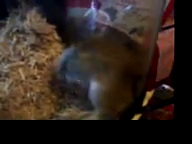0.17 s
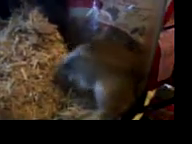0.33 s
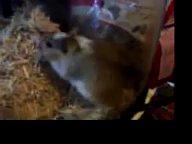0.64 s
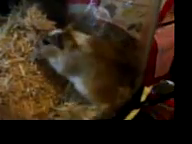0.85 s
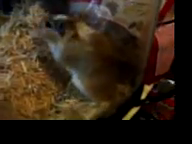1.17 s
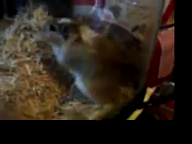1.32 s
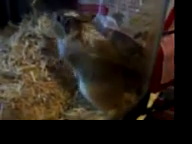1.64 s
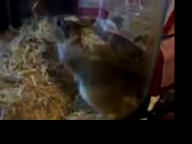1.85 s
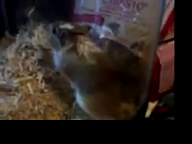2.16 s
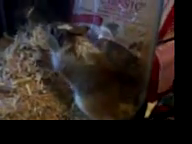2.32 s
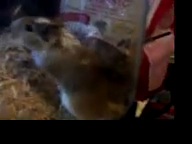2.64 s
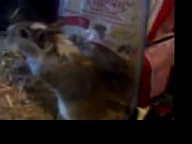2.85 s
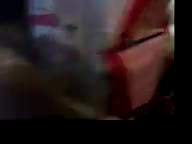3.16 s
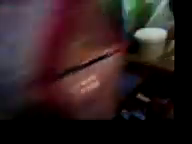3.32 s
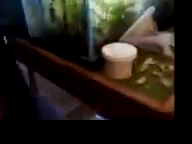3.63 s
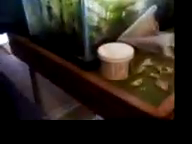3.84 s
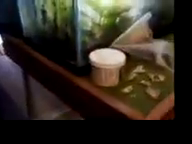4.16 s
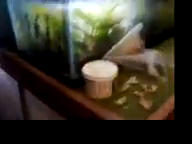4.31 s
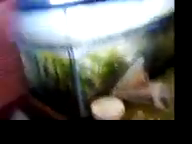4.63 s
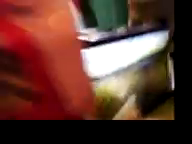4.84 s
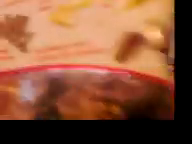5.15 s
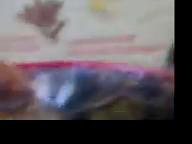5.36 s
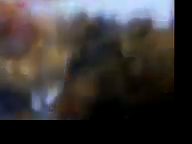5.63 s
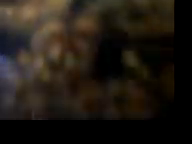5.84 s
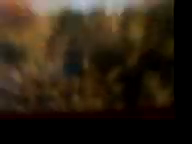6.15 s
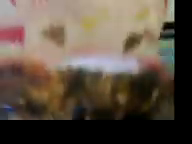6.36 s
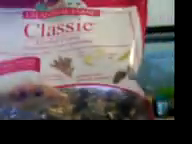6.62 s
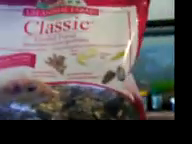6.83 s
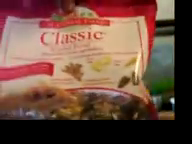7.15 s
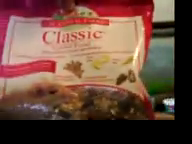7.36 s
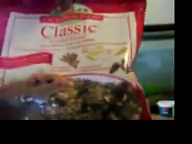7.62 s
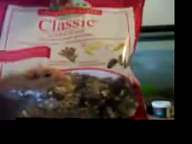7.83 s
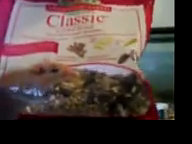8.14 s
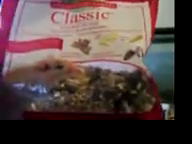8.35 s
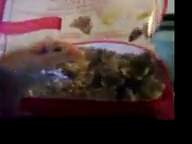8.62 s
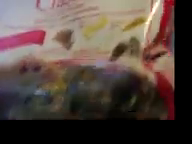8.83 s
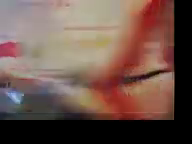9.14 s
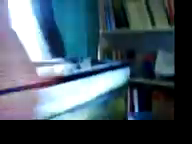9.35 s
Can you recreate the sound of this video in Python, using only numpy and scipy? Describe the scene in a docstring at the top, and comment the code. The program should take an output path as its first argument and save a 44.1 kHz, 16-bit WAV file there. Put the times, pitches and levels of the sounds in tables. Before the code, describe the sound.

A cheap, narrow-band microphone in a quiet room carries low hiss, faint hum, regular fast ticks and occasional tiny electrical pips. A sharp knock comes early, then little until a small clear tink near 2.7 seconds. Fingers then rap and scrape the plastic shell, crowding into a loud, clipping clatter around four seconds. Afterwards only scattered soft knocks, rubs and dull bumps remain, with another double click late on.

```python
"""A small camera is carried from a gerbil's tank to a bag of feed in a quiet room.
From 0 s: shaped-noise hiss, mains hum, a regular tick train, faint pips; skin slides on the shell (one resonance).
From 0.4 s: fingers scrape (stick-slip into resonances) and knock (decaying modes) its plastic shell.
At 0.42 s and 2.66 s small hard things tink (clean modes); from 2.87 s dull low bumps join, knocks crowding near 4 s.
The narrow-band microphone path overloads on the hardest knocks."""
import sys
import numpy as np
from scipy import signal
from scipy.fft import rfft, irfft
from scipy.io import wavfile
from scipy.ndimage import uniform_filter1d

SR = 44100
rng = np.random.default_rng(int(sys.argv[2]) if len(sys.argv) > 2 else 0)


def master_out(mix):
    """Clip the mix to full scale and print it as 16-bit PCM to the path in sys.argv[1]."""
    frames = np.transpose(np.atleast_2d(mix))
    ceiling = np.clip(frames, -1, 1)
    pcm = np.round(ceiling * 32767).astype(np.int16)
    wavfile.write(sys.argv[1], SR, pcm)


N = 418068
TIME_S = np.arange(N) / SR
MIC_EDGE_HZ, OUTPUT_EDGE_HZ = 4020, 16000


def amp(db):
    """Decibels to gain."""
    return 10 ** (np.asarray(db) / 20)


def unit(x):
    """Scales to rms 1."""
    return x / np.sqrt(np.mean(x ** 2) + 1e-20)


def read(points, hz):
    """Interpolates a spectrum table on a log-frequency axis."""
    point_hz, value = np.transpose(points)
    return np.interp(np.log(hz + 1), np.log(point_hz), value)


def add(mix, start_s, sound):
    """Mixes a sound in at start_s."""
    part = mix[max(round(start_s * SR), 0):][:len(sound)]
    part += sound[:len(part)]


def low_pass(x, hz, size):
    """Steep linear-phase low-pass, delay removed."""
    return signal.oaconvolve(x, signal.firwin(size, hz, window=("kaiser", 8), fs=SR), "same")


def resonate(x, hz, width_hz):
    """Two-stage resonance following hz: shift down to 0 Hz, smooth, shift back."""
    turn = np.exp(2j * np.pi * np.cumsum(hz * np.ones(len(x))) / SR)
    r = np.exp(-np.pi * width_hz / SR)
    smoothed = signal.lfilter([(1 - r) ** 2], [1, -2 * r, r * r], x / turn + 1e-18)
    return 2 * (turn * smoothed).real


def ring(modes, hz, t60_s, scatter, rise_s):
    """Decaying modes, peak 1; scatter detunes each blow's modes, rise_s is the contact time."""
    t = np.arange(SR // 4) / SR
    shifts = 1 + scatter * rng.standard_normal(len(modes))
    wave = np.zeros(len(t))
    for (factor, db, life), shift in zip(modes, shifts):
        decay = np.exp(-np.log(1000) * t / (t60_s * life))
        wave += amp(db) * decay * np.sin(2 * np.pi * hz * factor * shift * t)
    wave = wave * (1 - np.exp(-(t / rise_s) ** 2))
    return wave / abs(wave).max()


def stroke(t, length_s, attack_s, release_db_per_s):
    """Finger-stroke envelope: linear attack, hold until length_s, exponential release."""
    return np.minimum(t / attack_s, 1) * amp(-np.cumsum(release_db_per_s * (t > length_s)) / SR)


# hiss spectrum shape: frequency_hz, relative_level_db
HISS_SHAPE = [(15, -4), (30, -1), (80, -7.5), (150, -1.5), (300, -5.5), (600, -5.5), (1000, -11),
              (2000, -12.5), (3500, -16), (4400, -21)]
# mains hum partials: frequency_hz, rms_db
HUM_PARTIALS = [(59.6, -61), (119.3, -59.5), (179, -58.5), (238.6, -62.5), (299, -63)]
# electrical pips: centre_s
PIP_TIMES = [.061, .849, 1.176, 1.823, 3.523, 4.628, 4.813, 5.209, 6.84, 6.993, 7.816, 8.096, 8.716]
HISS_RMS_DB, PIP_RMS_DB = -47, -47  # hiss: below MIC_EDGE_HZ; pip: before its fades
TICK_FIRST_S, TICK_EVERY_S, TICK_MEAN_DB, TICK_SPREAD_DB = .0069, .05244, -19, 1.8
# low swing after every tick, level relative to the tick
SWING_DB, SWING_HZ, SWING_T60_S = -28, 118, 0.019 * 0.93


def electronics(pip_hz=1445, pip_s=0.032, pip_waver=0.044):
    """Shaped noise, steady sines, short wavering pips and a regular impulse train with low swings."""
    hiss = irfft(rfft(rng.standard_normal(N)) * amp(read(HISS_SHAPE, np.fft.rfftfreq(N, 1 / SR))), N)
    out = amp(HISS_RMS_DB) * hiss / np.std(low_pass(hiss, MIC_EDGE_HZ, size=255))
    for hz, db in HUM_PARTIALS:
        out += amp(db) * np.sqrt(2) * np.sin(2 * np.pi * (hz * TIME_S + rng.random()))
    t = np.arange(0, pip_s, 1 / SR)
    fades = signal.windows.tukey(len(t), .2)
    for centre_s in PIP_TIMES:
        waver = pip_waver * unit(uniform_filter1d(rng.standard_normal(len(t)), size=120))
        # phase skips part of a cycle midway
        skip_cycles = rng.uniform(.3, .6) * (t > rng.uniform(.3, .7) * pip_s)
        cycles = np.cumsum(pip_hz * (1 + waver)) / SR + skip_cycles
        pip = np.sqrt(2) * np.sin(2 * np.pi * cycles) * fades
        add(out, centre_s - pip_s / 2, amp(PIP_RMS_DB) * pip)
    tick_s = np.arange(TICK_FIRST_S, TIME_S[-1], TICK_EVERY_S)
    train = np.zeros(N)
    train[(tick_s * SR).astype(int)] = amp(TICK_MEAN_DB + TICK_SPREAD_DB * rng.standard_normal(len(tick_s)))
    swing = amp(SWING_DB) * ring([(1, 0, 1)], SWING_HZ, SWING_T60_S, scatter=0, rise_s=0.00074)
    return out - train + signal.oaconvolve(train, swing)[:N]


# main shell resonance as the grip tightens and loosens: time_s, resonance_hz
GRIP_PITCH = [(.1, 530), (.41, 765), (.55, 520), (2.75, 784), (3.2, 762), (3.8, 479), (4.15, 480),
              (4.29, 680), (4.33, 697), (4.42, 543), (5.2, 586), (9.4, 558)]


def grip_hz(t):
    """Main shell resonance at time t: a tighter grip raises it."""
    return np.interp(t, *np.transpose(GRIP_PITCH))


def slips(size, per_s, spread_db, smooth):
    """Stick-slip friction: tiny clicks of uneven size over a smooth rub."""
    clicks = (rng.random(size) < per_s / SR) * rng.choice([-1, 1], size)
    clicks = clicks * amp(spread_db * np.minimum(rng.exponential(1, size), 3))
    return unit(unit(clicks) + smooth * rng.standard_normal(size))


# skin sliding on the shell: start_s, length_s, level_db
SKIN_SLIDES = [(0, 0.069, -48), (0.474, .2, -48), (3.175, .25, -47), (4.45, .3, -44.5),
               (5.075, 0.055, -40.5), (5.25, 0.34, -54), (6.25, 0.086, -49), (6.857, 0.21, -45),
               (8.782, 0.27, -44), (9.095, 0.46, -49)]
SLIDE_ATTACK_S, SLIDE_RELEASE_DB_PER_S = 0.031, 108.5


def slide(width_hz=260):
    """Soft skin friction excites only the main shell resonance."""
    rub = resonate(slips(N, per_s=700, spread_db=-1.0, smooth=0.62), grip_hz(TIME_S), width_hz)
    pressure, t = np.zeros(N), np.arange(SR) / SR
    for start_s, length_s, db in SKIN_SLIDES:
        add(pressure, start_s, amp(db) * stroke(t, length_s, SLIDE_ATTACK_S, SLIDE_RELEASE_DB_PER_S))
    return unit(rub) * pressure


LOOSE_HZ, TIGHT_HZ = 579, 790


def by_grip(t, loose, tight):
    """Blends two values by grip tightness at time t, read from the shell resonance."""
    return np.interp(grip_hz(t), [LOOSE_HZ, TIGHT_HZ], [loose, tight])


# fingers scraping: start_s, length_s, body_db, grit_db
FINGER_SCRAPES = [(.399, .015, -24, -30.5), (2.757, 0.077, -33, -37), (2.882, 0.046, -43, -41),
                  (3.135, 0.035, -37, -37.5), (3.764, .085, -33, -41), (3.865, 0.048, -22.5, -43),
                  (3.909, 0.064, -17, -25), (4.027, 0.058, -32.5, -32.5), (4.088, 0.049, -18.5, -26.5),
                  (4.252, 0.023, -27.5, -32), (4.278, 0.064, -16, -25.5), (4.359, 0.046, -24.5, -33.5),
                  (4.46, 0.046, -40, -42), (8.426, .022, -39, -35)]
# low shell resonances: grip_pitch_factor, width_hz, relative_level_db
BODY_RESONANCES = [(.62, 170.5, -3.5), (1.0, 206, 5.5), (1.28, 219, 2.5)]
# upper shell resonances: centre_hz (before wander), width_hz, relative_level_db
GRIT_RESONANCES = [(1338, 550, -22.5), (1675, 550, 9), (2297, 790, 5.5), (3420, 2400, -9)]
SCRAPE_ATTACK_S = 0.0034
# a tight grip stops a scrape sooner
RELEASE_LOOSE_DB_PER_S, RELEASE_TIGHT_DB_PER_S = 178.5, 901.5


def scrapes(wander=0.11):
    """Stick-slip drives low body resonances and gritty upper ones that wander as the contact moves."""
    out, t = np.zeros(N), np.arange(SR // 2) / SR
    for start_s, length_s, body_db, grit_db in FINGER_SCRAPES:
        drive = slips(len(t), per_s=600, spread_db=3.5, smooth=0.75)
        grip = grip_hz(start_s + t)
        contact = np.exp(wander * unit(uniform_filter1d(rng.standard_normal(len(t)), size=1200)))
        body = unit(sum(amp(db) * resonate(drive, grip * factor, width_hz)
                        for factor, width_hz, db in BODY_RESONANCES))
        grit = unit(sum(amp(db) * resonate(drive, hz * contact, width_hz)
                        for hz, width_hz, db in GRIT_RESONANCES))
        release = by_grip(start_s + t, RELEASE_LOOSE_DB_PER_S, RELEASE_TIGHT_DB_PER_S)
        envelope = stroke(t, length_s, SCRAPE_ATTACK_S, release)
        add(out, start_s, (amp(body_db) * body + amp(grit_db) * grit) * envelope)
    return out


# after-ring colour: frequency_hz, level_db
AFTER_COLOUR = [(60, -36.5), (250, -4.5), (550, -6), (1100, 2), (2200, -4), (4000, 3.5)]
# after-ring decay: frequency_hz, t60_s
AFTER_DECAY = [(150, 0.6), (550, 0.34), (1200, 0.12), (3000, 0.12)]


def after_ring():
    """Diffuse tail of the shell's many weak modes: noise decaying at its own rate in each band."""
    hz, t, bands = signal.stft(rng.standard_normal(SR // 3), SR, nperseg=256)
    decay = np.exp(-np.log(1000) * t / read(AFTER_DECAY, hz)[:, None])
    tail = signal.istft(bands * decay, SR, nperseg=256)[1]
    tail = np.pad(tail / np.linalg.norm(tail), 256)
    colour = amp(read(AFTER_COLOUR, np.fft.rfftfreq(len(tail), 1 / SR)))
    return irfft(rfft(tail) * colour)[256:]


# finger knocks on the shell: start_s, thud_db, snap_db, thud_pitch_hz, snap_pitch_hz
FINGER_KNOCKS = [(0.4222, -16.5, -1, 670, 2453), (0.4294, -16.5, -7.5, 866, 2030),
                 (2.729, -22.5, -29.5, 860, 2190), (2.809, -16.5, -33, 840, 2200),
                 (2.872, 8.5, -1, 724, 2200), (2.8775, -3, -4.5, 809, 1930),
                 (2.974, -24.5, -22.5, 920, 2390), (3.008, -22, -21.5, 614, 1860),
                 (3.0159, -16.5, -18.5, 724, 2300), (3.075, -23, -25.5, 824, 2380),
                 (3.1648, -18, -9, 933, 1670), (3.175, -22, -20, 830, 2120), (3.4287, -11.5, -8, 703, 1883),
                 (3.768, -25.5, -25, 503, 2265), (3.867, -7, -13, 463, 1730), (3.9195, -.5, 1.5, 530, 1950),
                 (3.9335, -5.5, -8.5, 536, 2055), (3.945, -7, -16, 500, 1865),
                 (3.9635, -8.5, -6, 495, 1770), (3.9794, 1.5, -3, 486, 2356),
                 (4.0848, 1.5, -1.5, 556, 2200), (4.131, -7.5, -11, 474, 2015), (4.257, -8, -11, 616, 1910),
                 (4.279, -3.5, -2.5, 718, 1910), (4.285, 1, -6.5, 698, 2220), (4.297, -1.5, -16, 727, 2390),
                 (4.314, -7.5, -25, 670, 1650), (4.3505, -6, -5.5, 606, 1720),
                 (4.3823, -6.5, -18.5, 613, 1880), (4.457, -25, -14, 625, 1910),
                 (4.4807, -12.5, -21.5, 512, 2300), (4.91, -27.5, -31.5, 487, 2280),
                 (4.9485, -23, -25.5, 603, 1560), (5.0917, -11, -11.5, 500, 1720),
                 (5.252, -17, -36, 617, 1800), (5.9271, -18.5, -24.5, 636, 1432),
                 (5.9873, -21.5, -30.5, 488, 1790), (6.249, -12, -31, 430, 1340),
                 (6.5405, -29.5, -27.5, 735, 1970), (6.8622, -15, -22.5, 501, 1880),
                 (8.3494, -16.5, -11.5, 563, 2010), (8.4275, -37, -11, 612, 2910),
                 (8.4297, -18.5, -10.5, 603, 1970), (8.722, -29, -41, 474, 1586),
                 (9.0498, -24.5, -26, 518, 1840), (9.43, -21.5, -34.5, 488, 1660)]
# low shell modes: pitch_factor, relative_level_db, t60_factor
THUD_SHELL_MODES = [(.55, -8.5, 0.93), (.8, -3.5, 1.25), (1.03, 3, 0.91), (1.25, -8.5, 1.23)]
# high shell modes: pitch_factor, relative_level_db, t60_factor
SNAP_SHELL_MODES = [(.76, -1, 1), (1.0, 6, 0.56), (1.27, -2, 0.57), (1.65, -14, 0.41)]
# base t60 in thud cycles at equal snap and thud; shorter as the snap stands further over the thud
RING_CYCLES, SHORTEN_OCTAVES_PER_DB = 14.04, .02
CLICK_OVER_SNAP_DB = 2.5
TOUCH_LEAD_S, TOUCH_DB = 0.0096, -26  # light touch before landing, relative to the blow
AFTER_LOOSE_DB, AFTER_TIGHT_DB = -10, -25.5  # a tight grip damps the after-ring


def knocks():
    """Light touch, then contact click, brief snap and low thud of the shell modes, faint after-ring."""
    out = np.zeros(N)
    for start_s, thud_db, snap_db, thud_hz, snap_hz in FINGER_KNOCKS:
        t60_s = RING_CYCLES / thud_hz / 2 ** (SHORTEN_OCTAVES_PER_DB * (snap_db - thud_db))
        blow = amp(thud_db) * ring(THUD_SHELL_MODES, thud_hz, t60_s, scatter=0.041, rise_s=0.0019)
        blow += amp(snap_db) * ring(SNAP_SHELL_MODES, snap_hz, t60_s, scatter=.04, rise_s=.00025)
        blow[0] += amp(snap_db + CLICK_OVER_SNAP_DB)
        add(out, start_s - TOUCH_LEAD_S, amp(TOUCH_DB) * blow)
        add(out, start_s, blow)
        after_gain = amp(by_grip(start_s, AFTER_LOOSE_DB, AFTER_TIGHT_DB))
        add(out, start_s, after_gain * signal.oaconvolve(blow, after_ring()))
    return out


# touches on small hard things: start_s, peak_db, pitch_factor
HARD_TOUCHES = [(0.424, -34, 1.19), (2.6644, -25.5, 1.004)]
# their modes: base_hz, relative_level_db, base_t60_s
HARD_MODES = [(1560, -9.5, 0.42), (2017, 0, 0.15), (2446, -17, 0.2)]


def tink():
    """Each touch rings a few clean modes of a small hard thing."""
    out = np.zeros(N)
    for start_s, db, pitch_factor in HARD_TOUCHES:
        # t60_s here scales the table's base_t60_s
        add(out, start_s, amp(db) * ring(HARD_MODES, pitch_factor, t60_s=0.92, scatter=0, rise_s=0.00032))
    return out


# dull bumps of the whole camera: start_s, peak_db, base_hz, base_t60_s
CAMERA_BUMPS = [(2.871, -12.5, 75, 0.022), (4.12, -20, 274, .12), (5.094, -26.5, 196, 0.068),
                (5.258, -31, 112, 0.14), (5.354, -29, 250, 0.018), (5.357, -34, 98, 0.1),
                (6.2489, -22, 241, 0.042), (6.8626, -17.5, 273, 0.057)]


def bumps():
    """A push rocks the whole camera in one low, quickly dying swing."""
    out = np.zeros(N)
    for start_s, db, hz, t60_s in CAMERA_BUMPS:
        add(out, start_s, amp(db) * ring([(0.98, 0, 0.97)], hz, t60_s, scatter=0, rise_s=0.0015))
    return out


def scene(stiff_hz=110):
    """All sources in one channel; the small stiff shell passes on little bass."""
    stiffness = signal.butter(2, stiff_hz, "high", fs=SR, output="sos")
    handling = signal.sosfilt(stiffness, knocks() + scrapes() + slide())
    return (handling + bumps() + tink() + electronics())[None]


def record(dry, spill_db=-4, spill_hz=4900):
    """Narrow-band microphone path limits near 0.7; part of the distortion spills into the treble."""
    narrow = low_pass(dry[0], MIC_EDGE_HZ, size=191)
    limited = narrow / (1 + (narrow / .7) ** 24) ** (1 / 24)
    distortion = limited - narrow
    spill = distortion - low_pass(distortion, spill_hz, size=41)
    overloaded = narrow + low_pass(distortion, MIC_EDGE_HZ, size=191) + amp(spill_db) * spill
    return low_pass(overloaded, OUTPUT_EDGE_HZ, size=511)[None]


dry = scene()
out = record(dry)
master_out(out)
```